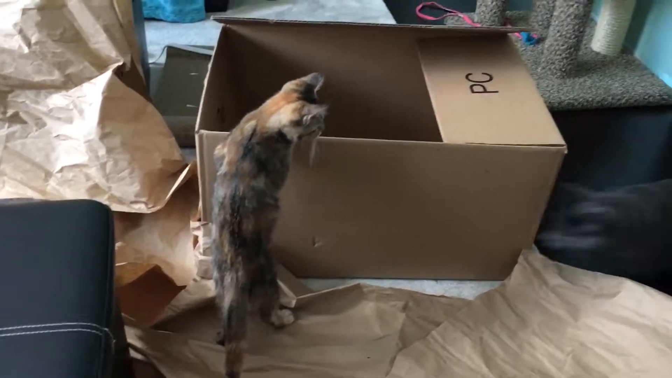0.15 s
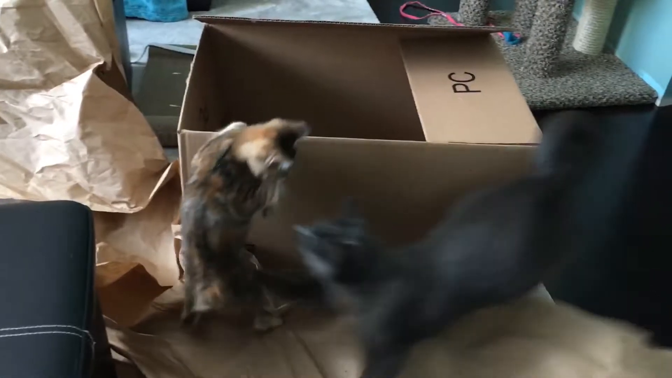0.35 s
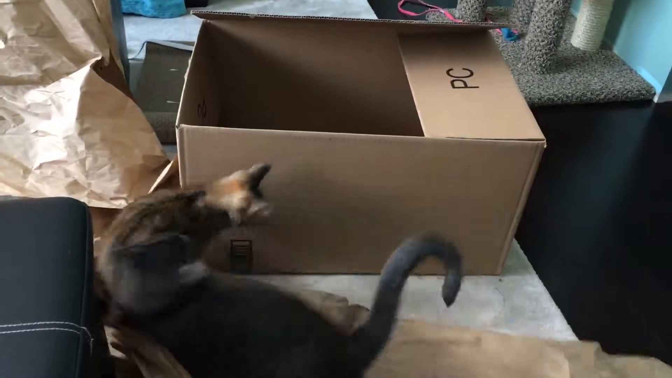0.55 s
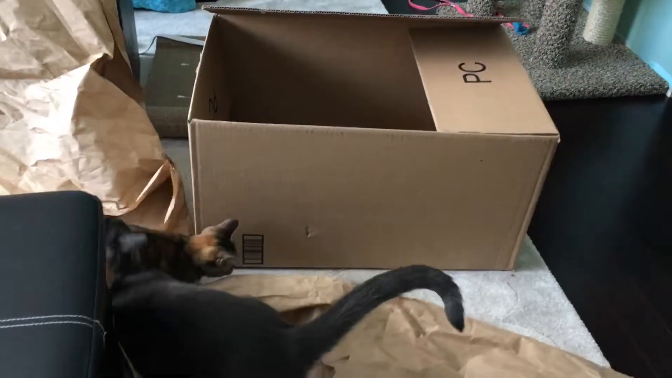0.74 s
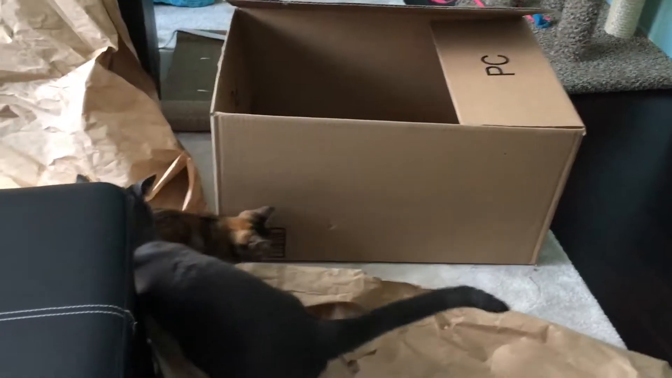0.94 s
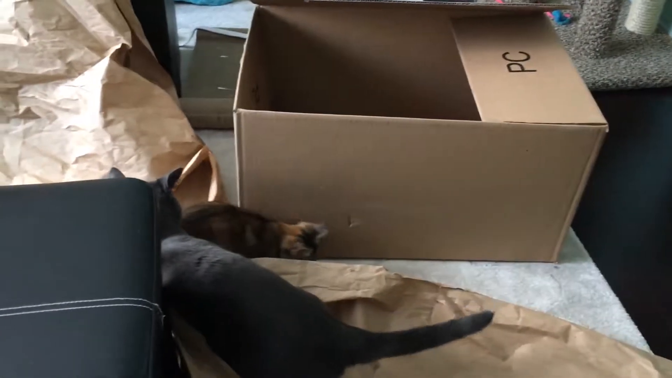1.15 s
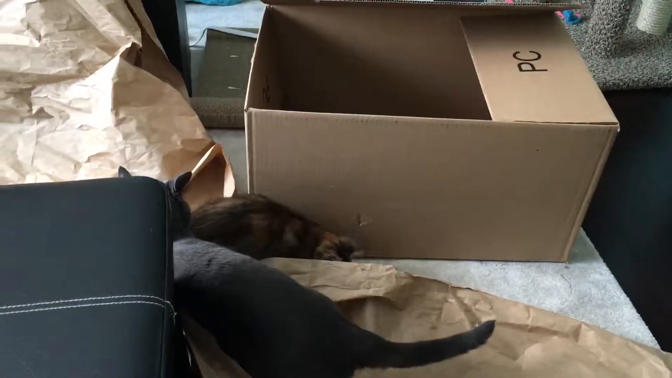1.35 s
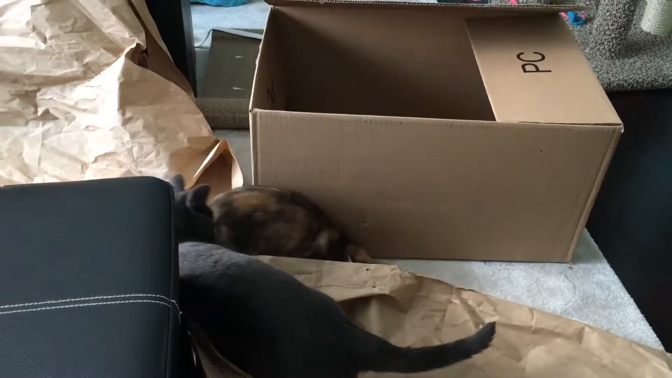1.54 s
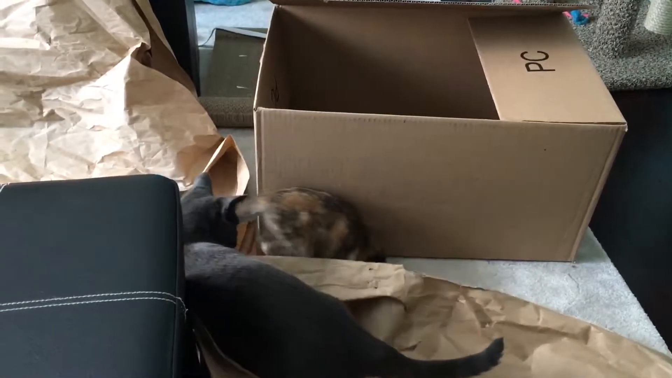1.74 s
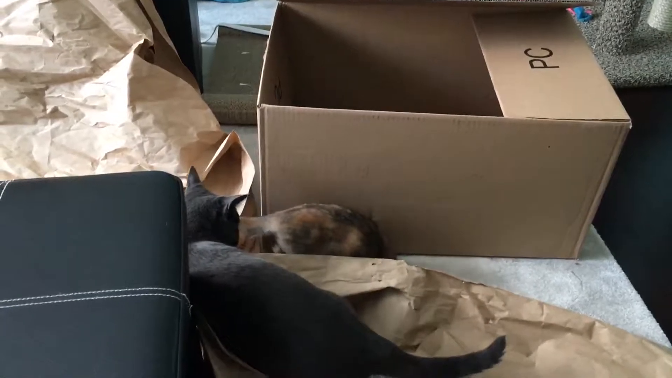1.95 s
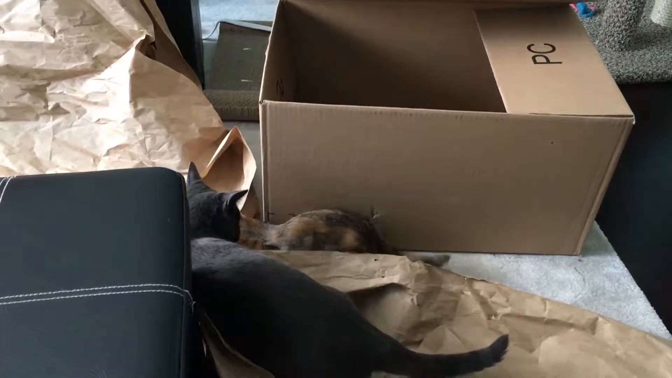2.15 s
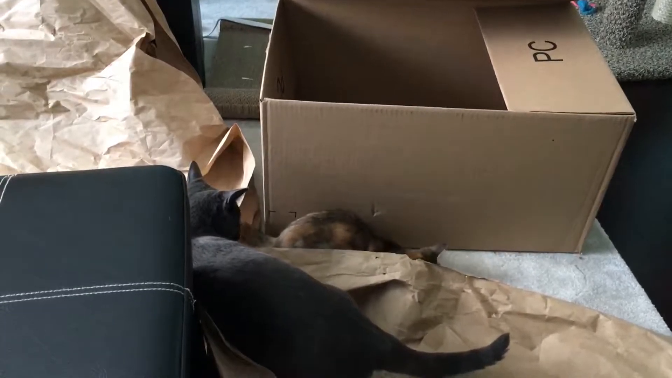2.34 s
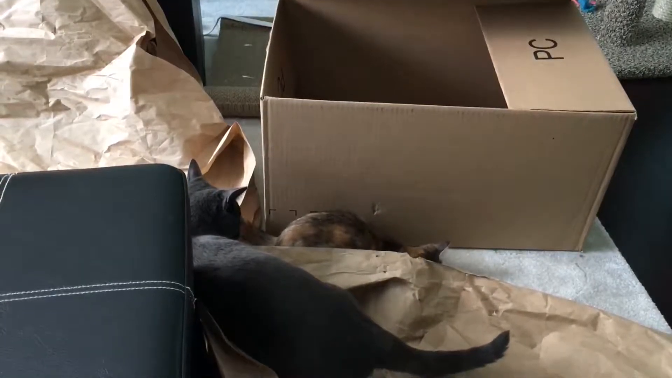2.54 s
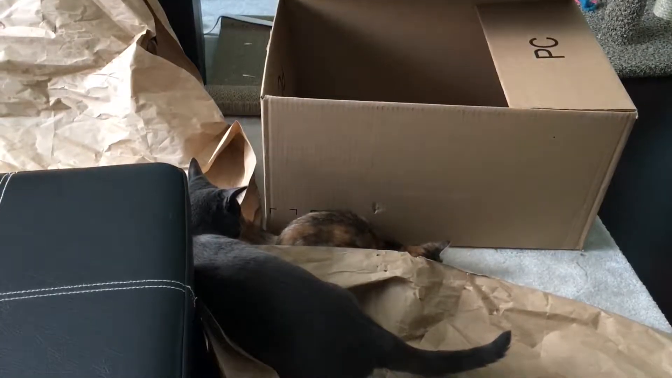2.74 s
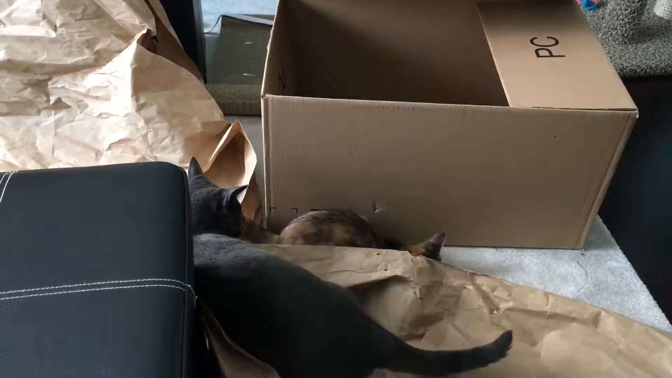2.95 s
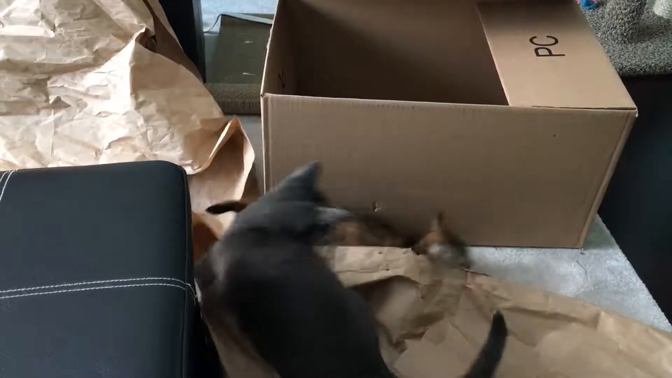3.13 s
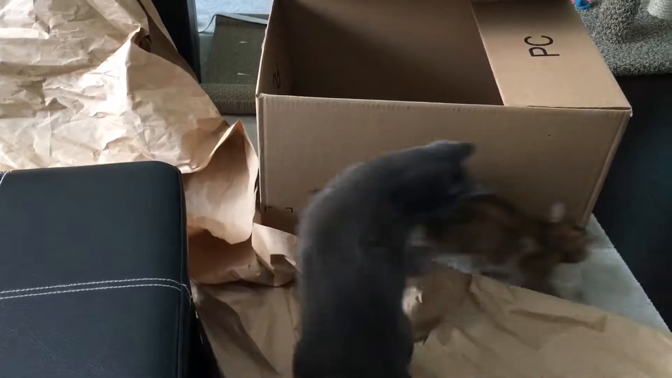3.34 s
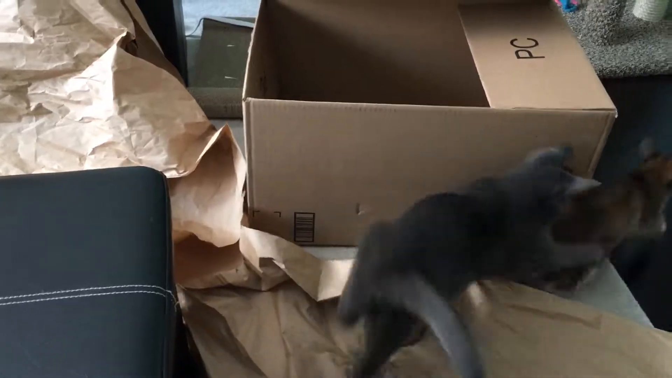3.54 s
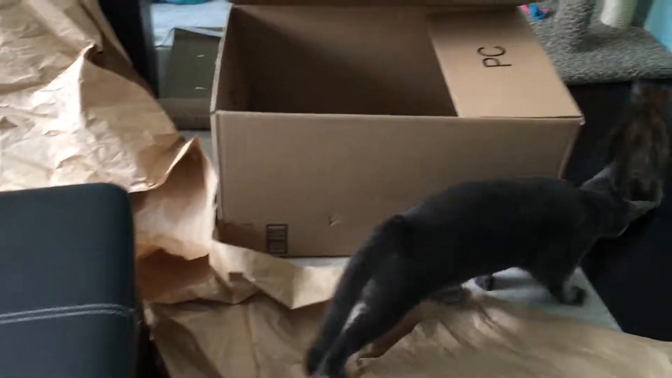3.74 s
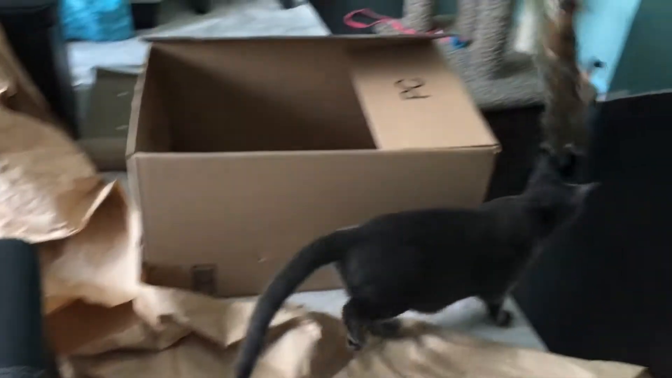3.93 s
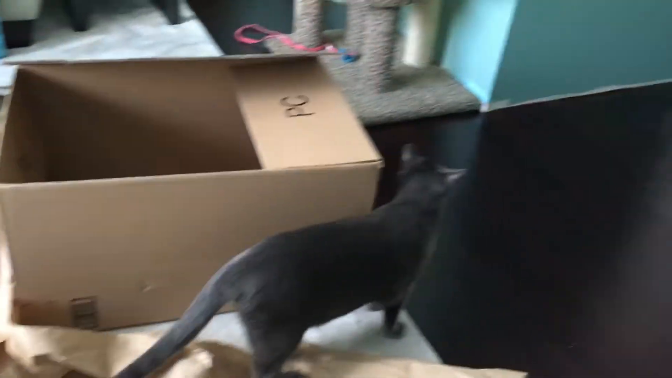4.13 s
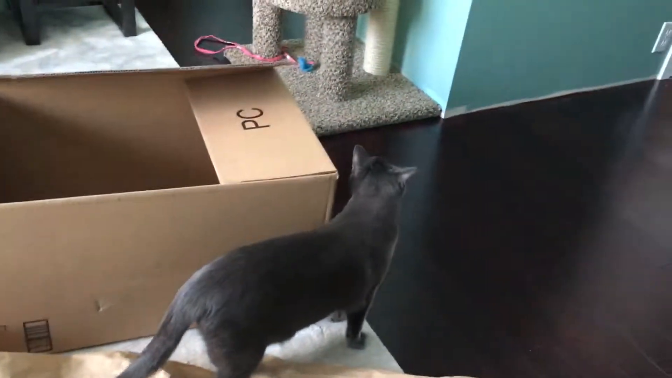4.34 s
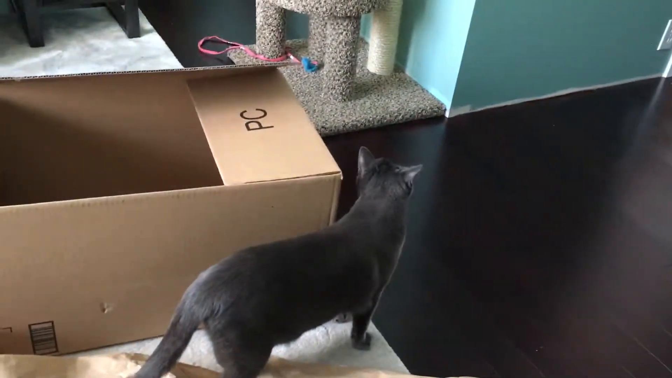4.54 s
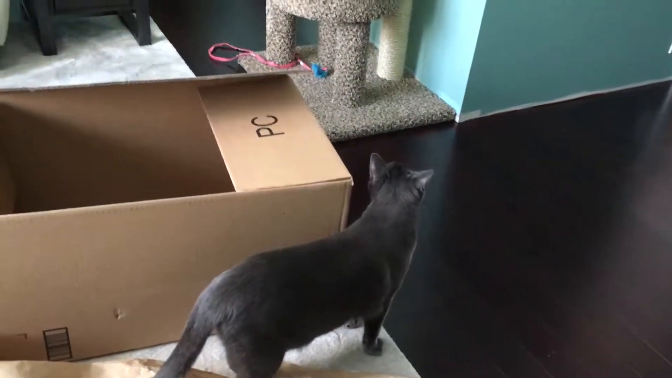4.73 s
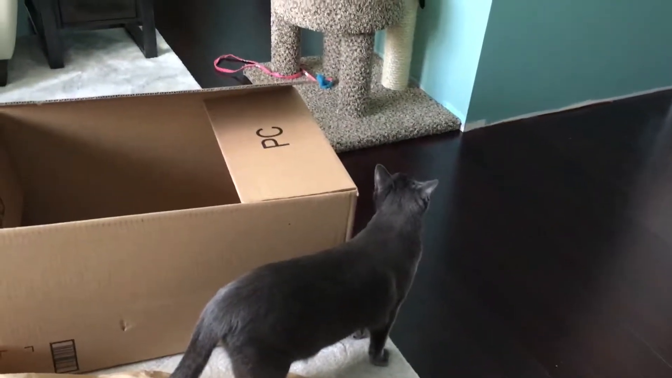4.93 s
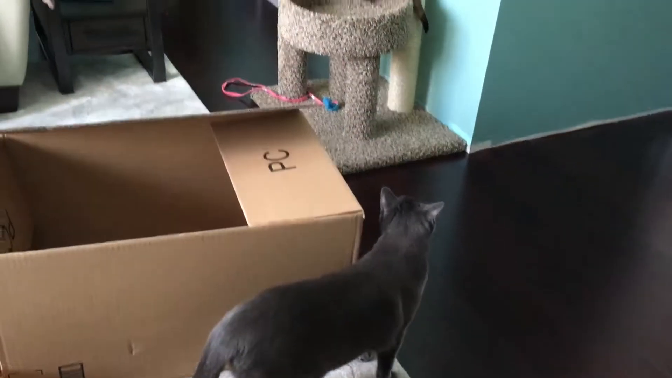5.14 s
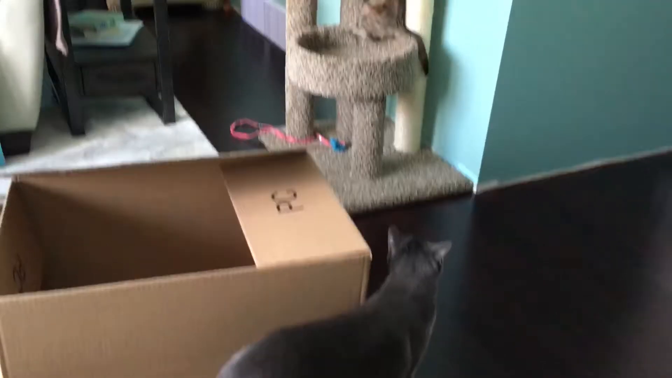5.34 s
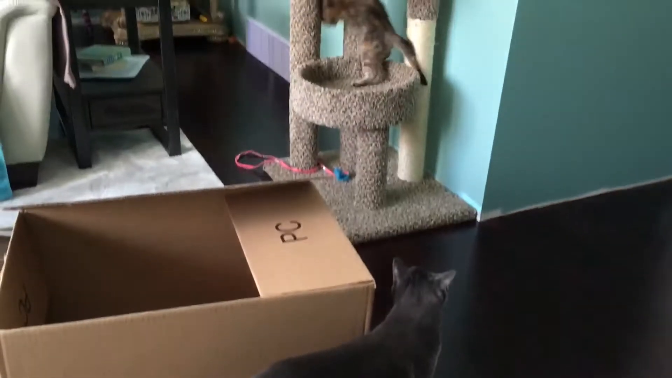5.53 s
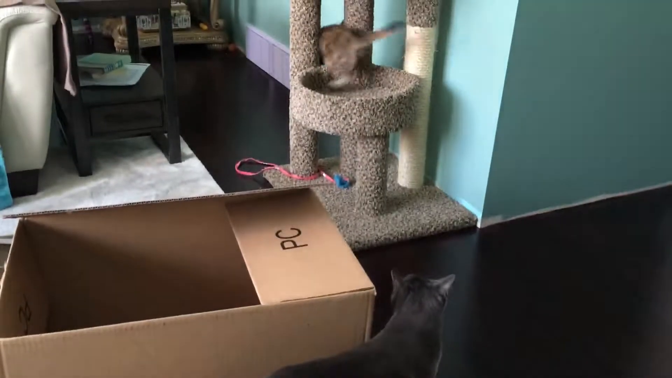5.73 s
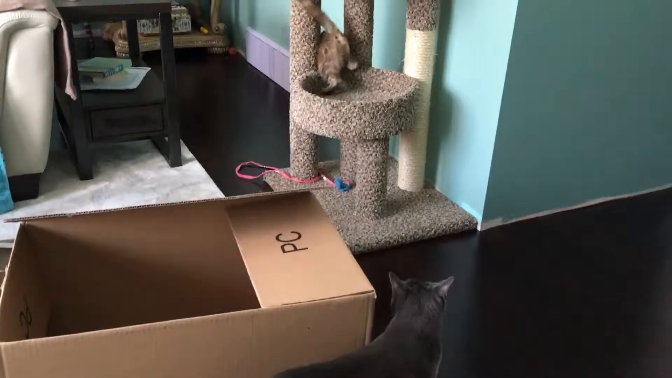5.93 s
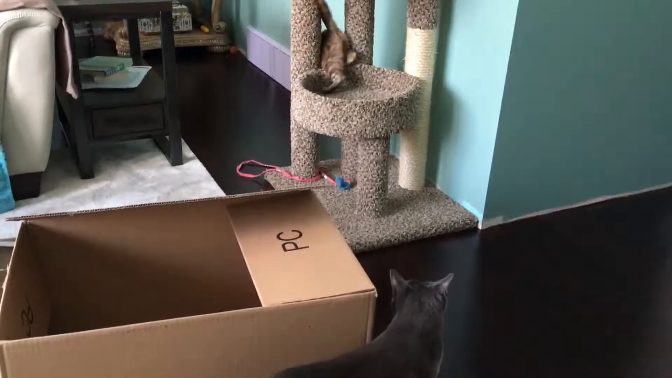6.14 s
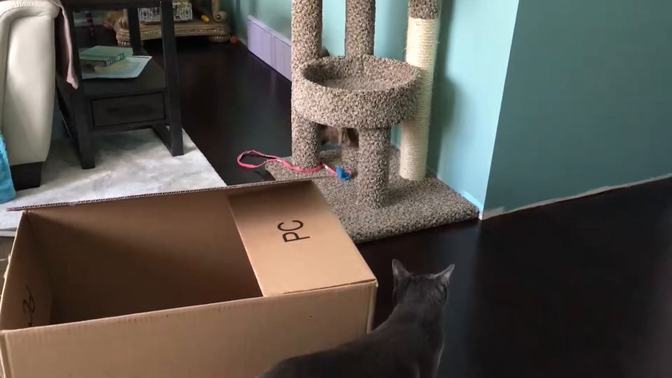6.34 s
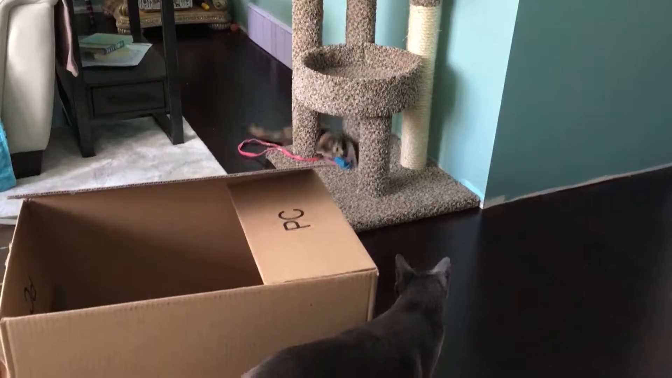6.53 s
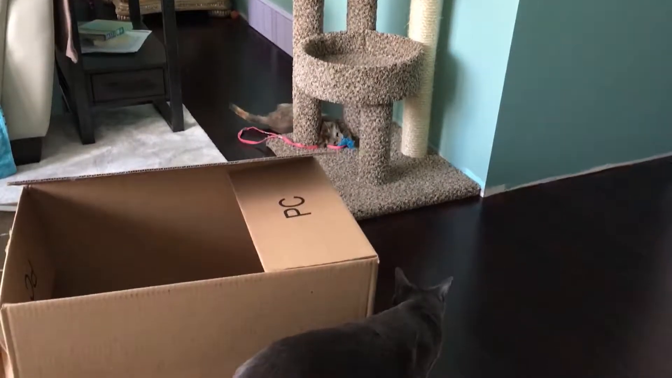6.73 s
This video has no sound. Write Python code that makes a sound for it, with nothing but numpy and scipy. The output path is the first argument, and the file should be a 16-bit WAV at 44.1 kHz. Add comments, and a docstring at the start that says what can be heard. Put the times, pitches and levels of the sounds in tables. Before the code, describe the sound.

Stiff packing paper crackles and snaps loudly under two pouncing cats, quiets, bursts again with galloping paws, then a soft thump on a carpeted cat tree.

```python
"""Stiff packing paper crackles and snaps as two cats pounce on it; then one leaps onto a cat tree and drops down it.
Creases are tiny noise bursts and ringing clicks that follow the weight on the sheet; slaps and slides are shaped crackle.
Paws thud on floor and tree as sets of fading tones, while claws tick and fur brushes on the tree's carpet.
The living room adds a brief echo, over the noise of room air and the steady tones of a quiet appliance."""
import sys
import numpy as np
from scipy import signal
from scipy.fft import rfft, irfft, next_fast_len
from scipy.io import wavfile
from scipy.ndimage import map_coordinates

SR = 44100
rng = np.random.default_rng(int(sys.argv[2]) if len(sys.argv) > 2 else 0)


def file_out(sig):
    """Save sig as 16-bit WAV at sys.argv[1]."""
    # one column per channel
    cols = np.atleast_2d(sig).T
    # limit, then scale
    lim = np.clip(cols, -1, 1)
    pcm = np.round(lim * 32767).astype(np.int16)
    wavfile.write(sys.argv[1], SR, pcm)


N = 298998  # length in samples
# Throughout, t60 is the time in seconds that a sound takes to fade by 60 dB.


def amp(db):
    """Turn decibels into a gain."""
    return 10 ** (np.asarray(db) / 20)


def unit(x):
    """Scale x to an rms level of 1."""
    return x / np.sqrt(np.mean(x ** 2) + 1e-20)


def along(points, hz):
    """Read a curve of (Hz, value) points, with pitch on a log axis."""
    f, v = np.transpose(points)
    return np.interp(np.log(hz + 1), np.log(f), v)


def add(track, s, sound):
    """Mix a sound into the track, starting at s seconds."""
    part = track[max(round(s * SR), 0):][:len(sound)]
    part += sound[:len(part)]


def colour(x, spectrum, size=4096):
    """Filter x to a curve of (Hz, dB) points, with no sound ahead of its cause (minimum phase)."""
    log_gain = np.log(amp(along(spectrum, np.fft.rfftfreq(size, 1 / SR))))
    cepstrum = irfft(log_gain)
    # Folding the second half onto the first makes the filter respond as early as it can.
    cepstrum[1:size // 2] *= 2
    cepstrum[size // 2 + 1:] = 0
    response = irfft(np.exp(rfft(cepstrum)))
    return signal.fftconvolve(x, response)[:len(x)]


def band(x, edge_hz, kind):
    """Keep the lows, the highs or a band of x with a Butterworth filter."""
    return signal.sosfilt(signal.butter(3, edge_hz, kind, fs=SR, output="sos"), x)


def wobble(rate):
    """Draw a smooth random curve through rate random points a second."""
    knots = rng.standard_normal(int(N * rate / SR) + 4)
    return map_coordinates(knots, [np.arange(N) * rate / SR])


def creases(rate, spread_db, t60, count=48, size=400):
    """Facets buckle at random, rate times a second, each as a brief fading noise burst of random size."""
    n, t = int(rate * N / SR), np.arange(size) / SR
    bursts = rng.standard_normal((count * size // 10, size)) * amp(-60 * t / t60)
    when, strength, facet = rng.random((n, 3)).T
    sizes = amp(-spread_db * np.log(np.maximum(strength, .02)))
    grains = sizes[:, None] * bursts[(facet * len(bursts)).astype(int)]
    places = (when * N).astype(int)[:, None] + np.arange(size)
    return unit(np.bincount(places.ravel(), grains.ravel(), N)[:N])


# Paws pressing into the sheet. Each row: start in seconds, crackle level in dB, hold in seconds,
# flapping of the whole sheet in dB above the crackle, crispness in dB above the crackle.
PRESSES = [(0.308, -42.5, .017, 1, -7.5), (0.385, -32, .02, -9, -3.5), (0.426, -29, .08, -6.5, -7),
           (0.502, -28, 0.024, -2, -9.5), (0.58, -35, 0.12, -4, -11), (0.718, -38.5, 0.07, -2.5, -5.5),
           (0.873, -41, 0.046, -7.5, -6.5), (0.92, -42, 0.03, -4.5, -9), (3.139, -51.5, 0.041, 0, -8),
           (3.214, -49.5, 0.071, -2.5, -6), (3.3, -41, 0.034, -5.5, -11.5), (3.385, -52.5, 0.087, -19, -7),
           (3.511, -50.5, 0.064, -5, -16), (3.661, -48, .022, 2, -2.5), (3.679, -44.5, 0.026, -3.5, -21),
           (3.835, -56, 0.11, -11, -16), (3.949, -51, 0.015, -0.5, -10), (4.199, -53, 0.012, -0.5, -9),
           (4.23, -68, 0.0096, -2, -5), (4.27, -49, 0.0041, -3.5, -8)]
PRESS_ATTACK_S = 0.0072  # the paw's weight comes on
SETTLE_S, SETTLE_PER_HOLD = .14, 4.5  # t60 of the settling sheet, longer after a longer press


def presses():
    """Gains of crackle, flapping and crispness: each press comes on fast, holds, then the sheet settles."""
    power, t = np.zeros((3, N)), np.arange(N) / SR
    for s, db, hold, flap_db, crisp_db in PRESSES:
        settled_db = 60 * np.maximum(t - s - hold, 0) / (SETTLE_S + SETTLE_PER_HOLD * hold)
        gain = np.clip((t - s) / PRESS_ATTACK_S, 0, 1) * amp(db - settled_db)
        power += (amp([[0], [flap_db], [crisp_db]]) * gain) ** 2
    return np.sqrt(power)


# The tone of the crumpling paper. Each row: pitch in Hz, relative level in dB.
PAPER = [(53, -37.5), (90, -2.5), (119, -8.5), (176, -2.5), (260, -1), (289, 3.5), (322, -7), (383, -2.5),
         (418, -8), (672, -3.5), (817, -7.5), (1670, -5), (8810, -16.5), (15800, -32)]


def crumpling(gains, crackle_db=-.5, flap_db=0, crisp_db=0, clump_db=0.5):
    """Small facets crackle and fizz, slightly unevenly; large panels of the sheet flap below them."""
    facets = creases(rate=1200, spread_db=1.5, t60=0.0073)
    fine = colour(facets * amp(clump_db * wobble(110)), PAPER)
    panels = colour(creases(rate=700, spread_db=3.5, t60=.012), PAPER)
    crackle = unit(band(fine, [620, 5000], "bandpass")) * gains[0]
    flap = unit(band(panels, 760, "lowpass")) * gains[1]
    crisp = unit(band(fine, 5500, "highpass")) * gains[2]
    return amp(crackle_db) * crackle + amp(flap_db) * flap + amp(crisp_db) * crisp


# Crouching cats slowly leaning on the sheet. Each row: moment of most weight in seconds,
# crinkle level in dB, half length in seconds, flapping in dB above the crinkle.
LEANS = [(1.08, -52, 0.098, -1.5), (1.282, -64, 0.11, 3), (1.56, -58, 0.17, 4), (1.892, -52.5, 0.14, -0.5),
         (2.279, -67.5, 0.28, 4), (2.843, -77, 0.16, 5), (3.136, -52, 0.028, -4), (3.389, -58.5, 0.14, 3.5)]


def leans():
    """Gains of crinkle and flapping: the weight comes and goes in a smooth bell."""
    power, t = np.zeros((2, N)), np.arange(N) / SR
    for s, db, half, flap_db in LEANS:
        bell = np.exp(-((t - s) / half) ** 2)
        power += (amp([[db], [db + flap_db]]) * bell) ** 2
    return np.sqrt(power)


def shifting(gains, crinkle_db=0, flap_db=0, dull_db=-4):
    """Under a slowly shifting weight the creases give way softly and fewer at a time."""
    sheet = colour(creases(rate=380, spread_db=2.5, t60=0.023, size=600), PAPER)
    sheet = colour(sheet, [(2000, 0), (6000, dull_db)])
    crinkle = unit(band(sheet, 720, "highpass")) * gains[0]
    flap = unit(band(sheet, [140, 700], "bandpass")) * gains[1]
    return amp(crinkle_db) * crinkle + amp(flap_db) * flap


# The tone of one click's noisy part. Each row: pitch in Hz, relative level in dB.
CREASE = [(100, -16.5), (500, 0.5), (1600, 0), (4000, 1.5), (8000, -3.5), (16000, -17)]


def clicks(rows, length, ring_t60, ring_db, bright_db, size=2048):
    """Each click is an impulse smeared over a few milliseconds, with a fading ring at its own pitch."""
    out, t = np.zeros(N), np.arange(size) / SR
    for s, db, hz, treble_db in rows:
        # An even spectrum with the phase of a short noise burst is a smeared impulse.
        phase = np.angle(rfft(rng.standard_normal(size) * np.exp(-(t / length) ** 2)))
        smeared = irfft(np.exp(1j * phase)) * np.exp(-(t / length / 2) ** 2)
        burst = unit(colour(smeared, CREASE))
        ring = unit(np.sin(2 * np.pi * hz * t) * amp(-60 * t / ring_t60))
        click = colour(burst + amp(ring_db) * ring, [(2500, 0.0089), (8000, treble_db + bright_db)])
        add(out, s, amp(db) * click / np.abs(click).max())
    return out


SCATTER_DB = 5  # most that size and treble stray, up or down, among creases under the same load


def buckles(load, rate, top_db, growth, hz, octaves, treble_db, count=300):
    """Click rows at random moments while the sheet is loaded; more load makes bigger clicks."""
    gap, size, pitch, treble = rng.uniform(-1, 1, (count, 4)).T
    s = np.cumsum(1 + gap) / rate
    share = np.interp(s, np.arange(N) / SR, load / load.max(), right=0)
    db = top_db + growth * 20 * np.log10(share + 1e-9) + SCATTER_DB * size
    rows = np.column_stack([s, db, hz * 2 ** (octaves * pitch), treble_db + SCATTER_DB * treble])
    return rows[share > .003]


# The loudest creases snapping through. Each row: start in seconds, peak level in dB before a shared boost,
# pitch of the facet in Hz, treble in dB before a shared brightness change.
SNAPS = [(0.326, -26.5, 2030, -2.5), (0.402, -17, 2850, 2), (0.464, -16, 1690, -1), (0.522, -15, 1680, -5),
         (0.953, -25, 1280, -1), (1.019, -32, 990, -4), (1.39, -39, 1100, -6), (1.46, -44.5, 1190, 3),
         (1.568, -41, 2050, -13), (1.794, -34, 1690, -3), (1.825, -29, 1750, 0.5), (1.851, -33, 1820, 0),
         (1.876, -29, 1710, -0.5), (1.904, -27.5, 2060, -8.5), (1.946, -33, 1470, -5),
         (1.973, -28.5, 1790, -3.5), (2.097, -41, 2190, -10.5), (2.137, -37, 2110, 2.5),
         (2.499, -47.5, 2940, -15), (2.546, -45, 1190, -9), (2.593, -44.5, 1030, -18),
         (2.653, -50, 1280, -17), (3.09, -53, 800, -12), (3.137, -33, 1450, -7), (3.214, -25, 1940, -7),
         (3.413, -34, 1250, -5), (3.44, -34, 1570, 1), (3.498, -35.5, 1850, 4.5), (3.543, -31, 2316, -10),
         (3.581, -29.5, 2540, 5.5), (3.666, -30, 3200, 5.5), (3.694, -29.5, 1450, -7),
         (3.717, -33, 1270, -2), (3.728, -29.5, 3770, 5.5), (3.757, -28.5, 4590, 0), (3.909, -32, 2420, -5),
         (3.921, -36, 1640, -3.5), (3.961, -33.5, 1580, -2), (4.208, -34.5, 1820, -8),
         (4.247, -30.5, 3530, 0), (4.278, -36.5, 1610, 1)]
FACET_HZ, FACET_OCTAVES = 1816, .5  # a snapping facet's usual pitch and its scatter
NEIGHBOUR_S, NEIGHBOUR_DB = .005, -6  # a snap sets off the next crease: usual delay and relative size


def snapping(load, loud_db=1.26, bright_db=-0.5):
    """Stiff creases snap loudly and each sets off a neighbour; many lesser ones follow the load on the sheet."""
    s, db, hz, treble_db = np.transpose(SNAPS)
    pitch, delay, size = rng.uniform(-1, 1, (len(s), 3)).T
    loud = np.column_stack([s, db + loud_db, hz, treble_db])
    next_s = s + NEIGHBOUR_S * 2 ** (delay / 2)
    next_db = db + loud_db + NEIGHBOUR_DB + SCATTER_DB * size
    neighbours = np.column_stack([next_s, next_db, hz * 2 ** (FACET_OCTAVES * pitch), treble_db])
    lesser = buckles(load, rate=32, top_db=-18, growth=0.91, hz=FACET_HZ, octaves=FACET_OCTAVES, treble_db=-3.5)
    rows = np.vstack([loud, neighbours, lesser])
    return clicks(rows, length=0.003, ring_t60=0.0088, ring_db=-3.5, bright_db=bright_db)


PANEL_HZ, PANEL_OCTAVES = 723, .45  # a wide panel's usual pitch and its scatter


def popping(load):
    """Wide panels pop softly and low, more strongly under more load."""
    rows = buckles(load, rate=16, top_db=-28, growth=.58, hz=PANEL_HZ, octaves=PANEL_OCTAVES, treble_db=-19)
    return clicks(rows, length=0.0084, ring_t60=0.022, ring_db=0, bright_db=5.0)


# Paws slapping the sheet flat. Each row: start in seconds, level in dB, t60 in seconds.
SLAPS = [(0.316, -33.5, 0.055), (0.375, -39.5, .025), (0.394, -26.5, 0.13), (0.44, -24, .1),
         (0.516, -23, 0.22), (0.73, -27, 0.17), (3.215, -35.5, .05), (3.316, -20.5, .065)]


def slaps():
    """A paw crushes many creases at once: dense crackle that starts fast and fades."""
    out, t = np.zeros(N), np.arange(SR // 4) / SR
    press = 1 - np.exp(-t / .003)
    for s, db, t60 in SLAPS:
        add(out, s, amp(db - 60 * t / t60) * press)
    crackle = creases(rate=6000, spread_db=-1, t60=.003, size=128)
    return out * unit(colour(crackle, PAPER))


def rubs(rows, spectrum, rise):
    """Friction hisses as dense tiny crackle: a quick start, then the surfaces come to rest."""
    out, t = np.zeros(N), np.arange(SR // 2) / SR
    for s, db, length in rows:
        add(out, s, amp(db) * (1 - np.exp(-t / rise)) * np.exp(-(t / length) ** 2))
    crackle = creases(rate=4000, spread_db=1.0, t60=0.0041, size=120)
    return out * unit(colour(crackle, spectrum))


# Paper sliding over itself. Each row: start in seconds, level in dB, length in seconds.
SLIDES = [(1.455, -60.5, 0.11), (2.22, -55.5, 0.023), (2.296, -50, 0.049), (2.325, -61, 0.1),
          (2.791, -58.5, 0.031), (3.22, -52.5, .06), (3.507, -43, 0.04), (3.829, -46.5, 0.066)]
# The tone of that sliding. Each row: pitch in Hz, relative level in dB.
HISS = [(200, 19), (600, 4.5), (2500, 8.5), (6000, 4.5), (12000, -0.5), (16000, -9)]


def slides():
    """Paper rubs on paper with a short hiss."""
    return rubs(SLIDES, HISS, rise=0.005)


def thuds(rows, modes, focus_db, rise, blur_hz):
    """A padded paw rings the modes near its main pitch most strongly; their pitches drift, so the ring is dull."""
    out, t = np.zeros(N), np.arange(SR // 2) / SR
    mode_hz, mode_db, t60 = np.transpose(modes)[:, :, None]
    for s, db, hz in rows:
        level, side = rng.standard_normal((2, len(modes), 1))
        drift = band(rng.standard_normal((len(modes), len(t))), 60, "lowpass")
        phase = 2 * np.pi * np.cumsum(mode_hz + blur_hz * unit(drift), axis=1) / SR
        # Each mode loses focus_db for every octave between it and the main pitch.
        strength = mode_db + level - focus_db * np.abs(np.log2(mode_hz / hz))
        ring = np.sign(side) * amp(strength - 60 * t / t60) * np.sin(phase)
        thud = ring.sum(0) * (1 - np.exp(-t / rise))
        add(out, s, amp(db) * thud / np.abs(thud).max())
    return out


# Paws landing on the floor. Each row: start in seconds, peak level in dB, main pitch in Hz, paws in a row.
STEPS = [(0.226, -34.5, 201, 1), (0.246, -33, 117.6, 1), (0.388, -47, 221, 1), (0.524, -32.5, 170, 2),
         (0.729, -28, 220, 1), (1.678, -45.5, 270, 1), (1.824, -41, 223, 1), (3.35, -43, 75, 1),
         (3.659, -38.5, 80, 1), (3.809, -37.5, 168.4, 4)]
# The ringing modes of the floor. Each row: pitch in Hz, relative level in dB, t60 in seconds.
FLOOR = [(57, -7, 0.42), (84.5, -4, 0.21), (115, 6.5, 0.068), (146.5, 3, 0.068), (166, -5.5, 0.4),
         (246, -6, 0.27), (250, -6.5, 0.083), (384, -8, 0.13)]
PAW_GAP_S = .066  # between the paws of a gallop


def footfalls():
    """Paws thud on the floor; the paws of one bound land in an even run at the same level."""
    rows = [(s + k * PAW_GAP_S, db, hz) for s, db, hz, paws in STEPS for k in range(round(paws))]
    return thuds(rows, FLOOR, focus_db=7.5, rise=.004, blur_hz=16)


# Paws landing on the cat tree. Each row: start in seconds, peak level in dB, main pitch in Hz.
LANDINGS = [(5.29, -45, 1150), (5.56, -48.5, 288), (5.61, -53, 221.3), (5.72, -51, 134),
            (5.856, -46, 329.6), (5.885, -47.5, 308.5), (6.555, -39.5, 397), (6.574, -36.5, 201),
            (6.637, -29, 151.6), (6.65, -38.5, 1010), (6.668, -27, 167), (6.695, -34, 78.3)]
# The ringing modes of the tree. Each row: pitch in Hz, relative level in dB, t60 in seconds.
TREE = [(74.6, -1.5, 0.14), (119.3, -5, 0.16), (159.2, 1, 0.13), (210.7, -8.5, 0.145), (295, -10.5, 0.23),
        (373.7, -10.5, 0.12), (470, -12.5, 0.083), (574, -8, 0.045), (684, -8, 0.056), (771.5, -4, 0.031),
        (885, -12, 0.042), (1237, -3, 0.016), (1540, -25, 0.039), (1820, -5, 0.033)]


def tree_landings():
    """Paws thud on the carpeted tree, which rings at its own modes."""
    return thuds(LANDINGS, TREE, focus_db=12.0, rise=0.0037, blur_hz=20)


# Claws catching in the tree's carpet. Each row: start in seconds, peak level in dB before a shared boost,
# pitch in Hz, treble in dB before a shared brightness change.
CLAWS = [(5.243, -62, 1110, -35), (5.29, -50.5, 1460, -52), (5.322, -48.5, 2130, -18),
         (5.607, -49, 1080, -41), (5.748, -37.5, 1840, -15), (6.36, -53, 2060, -13),
         (6.553, -42.5, 1750, -26), (6.651, -69, 1210, -28)]
# Fur and paws brushing the carpet. Each row: start in seconds, level in dB, length in seconds.
BRUSHES = [(4.45, -70, 0.21), (4.62, -71.5, 0.077), (4.98, -63.5, 0.043), (5.39, -64, 0.129),
           (5.53, -68.5, 0.14), (6.36, -63, 0.122), (6.556, -50, 0.058), (6.6, -51.5, 0.074),
           (6.634, -46.5, 0.053)]
# The tone of that brushing. Each row: pitch in Hz, relative level in dB.
CARPET = [(150, -5), (350, 4), (600, -1.5), (900, -9.5), (1300, -9.5), (2000, -17), (3000, -26),
          (6000, -28), (15000, -43)]


def cat_tree(claw_db=1, brush_db=0):
    """Claws tick and fur brushes on the carpeted posts."""
    claws = clicks(CLAWS, length=0.0058, ring_t60=0.0061, ring_db=-5, bright_db=6)
    brushes = rubs(BRUSHES, CARPET, rise=0.0073)
    return amp(claw_db) * claws + amp(brush_db) * brushes


# How long the room rings. Each row: pitch in Hz, t60 in seconds.
ROOM = [(100, 0.47), (400, 0.66), (2000, 0.46), (6000, 0.28), (15000, 0.32)]


def room(x, onset=0.0026, count=20):
    """Echo as fading noise, longest in the mids; it blends through count random tails as the cats move."""
    out, t = np.zeros(N), np.arange(N) / SR
    for centre in np.linspace(0, N / SR, count):
        hz, age, z = signal.stft(rng.standard_normal(SR // 2), SR, nperseg=256)
        fade = amp(-60 * age / along(ROOM, hz)[:, None]) * (1 - np.exp(-age / onset))
        tail = signal.istft(z * fade, SR, nperseg=256)[1]
        share = np.clip(1 - np.abs(t - centre) * (count - 1) * SR / N, 0, 1)
        near = np.flatnonzero(share)
        echo = signal.fftconvolve(x[near] * np.sqrt(share[near]), tail / np.linalg.norm(tail))
        add(out, near[0] / SR, echo)
    return out


# The tone of the room air. Each row: pitch in Hz, relative level in dB.
AIR = [(25, -36.5), (40, -16.5), (55, -14), (90, -8.5), (140, -13), (190, -15.5), (290, -18), (450, -24),
       (800, -30.5), (1500, -32), (3000, -36.5), (8000, -44.5), (15800, -49.5)]
# The tones of the appliance. Each row: pitch in Hz, rms level in dB.
HUM = [(50, -91.5), (85.1, -67.5), (98.9, -72.5), (121.7, -73), (221, -81.5), (293, -84.5)]


def background(air_db=-66):
    """Room air is shaped noise; an appliance hums in several steady tones."""
    t = np.arange(N) / SR
    hum = sum(amp(db) * np.sqrt(2) * np.sin(2 * np.pi * (hz * t + rng.random())) for hz, db in HUM)
    air = unit(colour(rng.standard_normal(N), AIR))
    return hum + amp(air_db) * air


def scene(paper_room_db=-6, snap_room_db=-8, tree_room_db=-8, thud_room_db=-8):
    """Add up paper, paws, cat tree, their echo and the background."""
    pressed, leaned = presses(), leans()
    load = np.hypot(pressed[0], leaned[0])
    snaps = snapping(load) + popping(load)
    paper = crumpling(pressed) + shifting(leaned) + slaps() + slides()
    paws = footfalls() + tree_landings()
    tree = cat_tree()
    paper_sent = amp(paper_room_db) * paper + amp(snap_room_db) * snaps
    echo = room(paper_sent + amp(tree_room_db) * tree + amp(thud_room_db) * paws)
    return (paper + snaps + tree + paws + echo + background())[None]


LOW_HZ, TOP_HZ = 48, 15900  # the microphone's range


def record(dry):
    """The microphone weakens the deepest bass and keeps nothing above its band limit."""
    m = next_fast_len(N + SR // 2)
    spectrum = rfft(band(dry, LOW_HZ, "highpass"), m)
    kept = np.fft.rfftfreq(m, 1 / SR) < TOP_HZ
    return irfft(spectrum * kept, m)[:, :N]


dry = scene()
out = record(dry)
file_out(out)
```